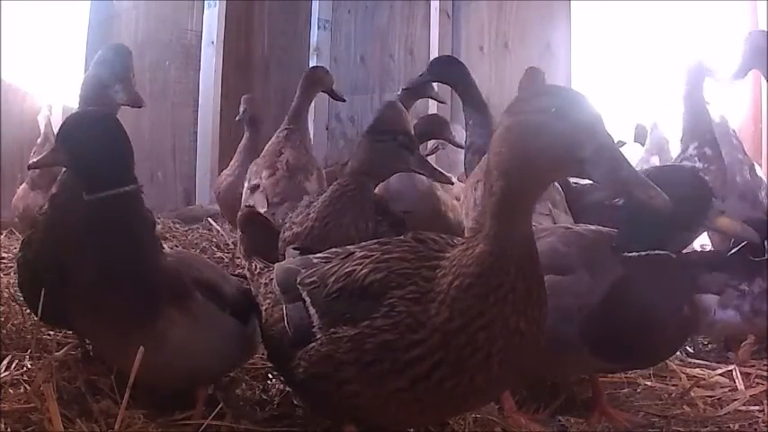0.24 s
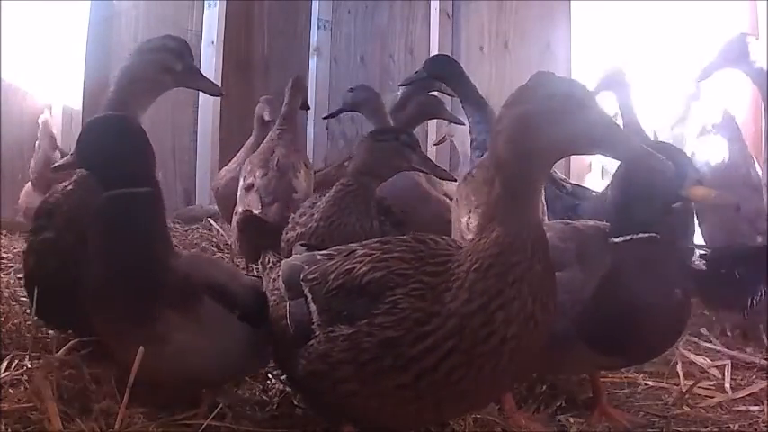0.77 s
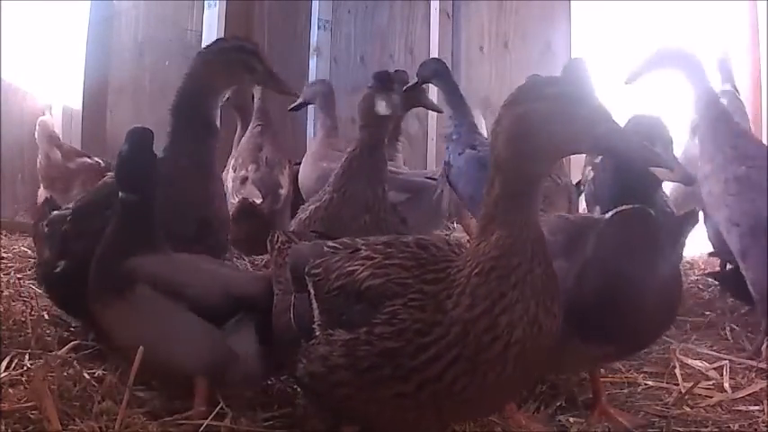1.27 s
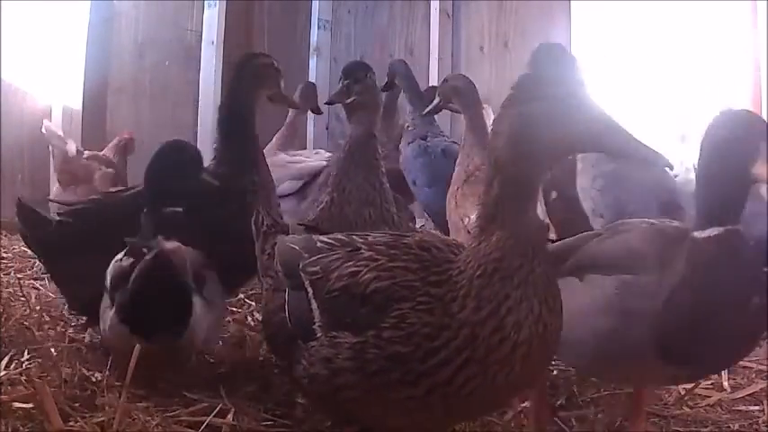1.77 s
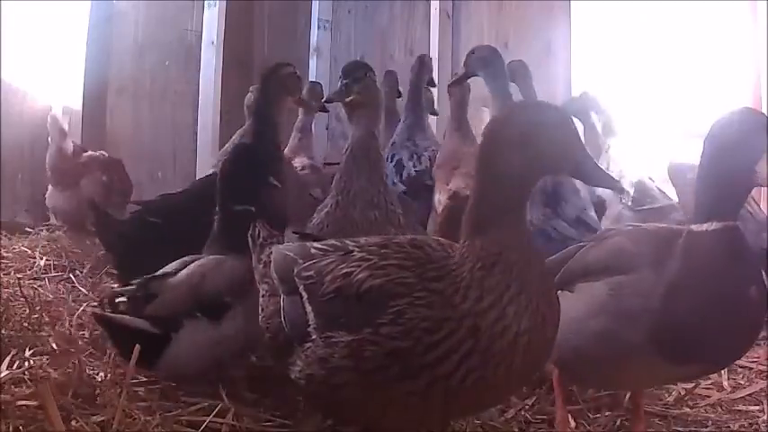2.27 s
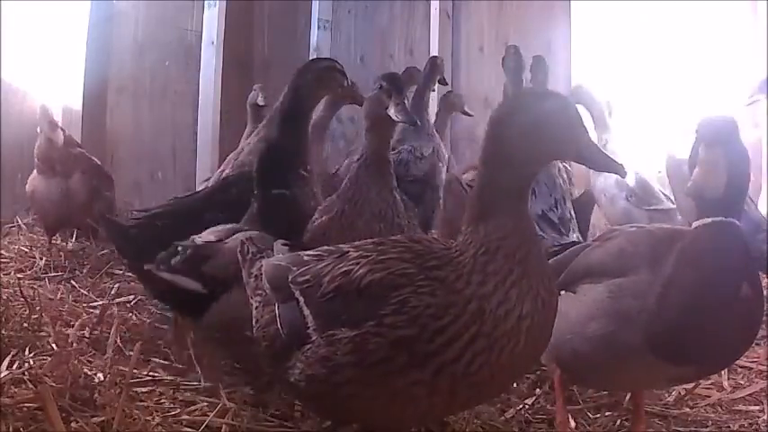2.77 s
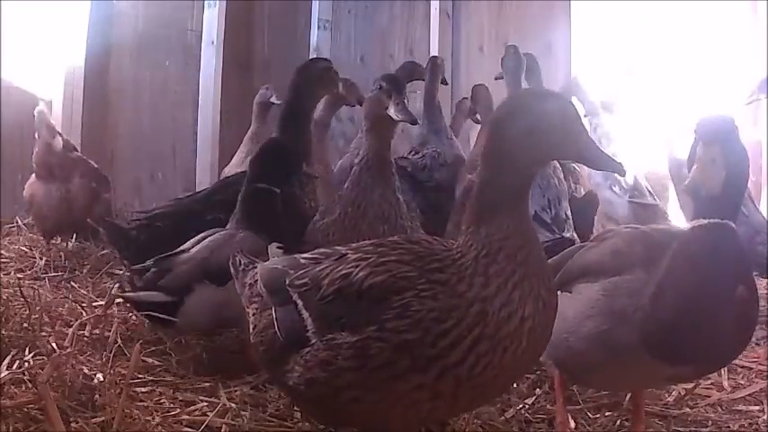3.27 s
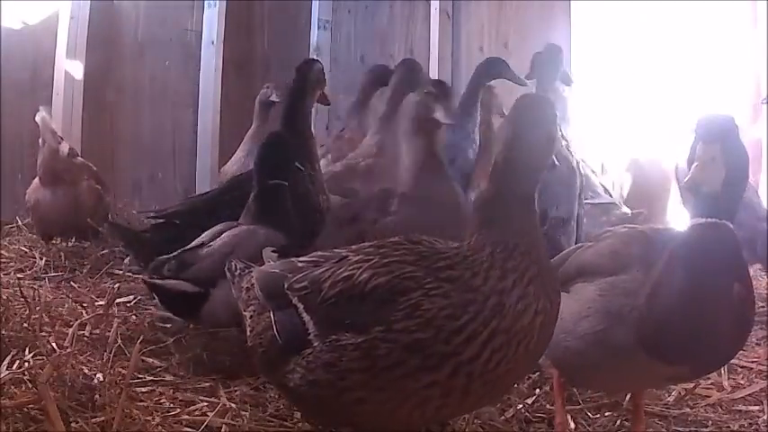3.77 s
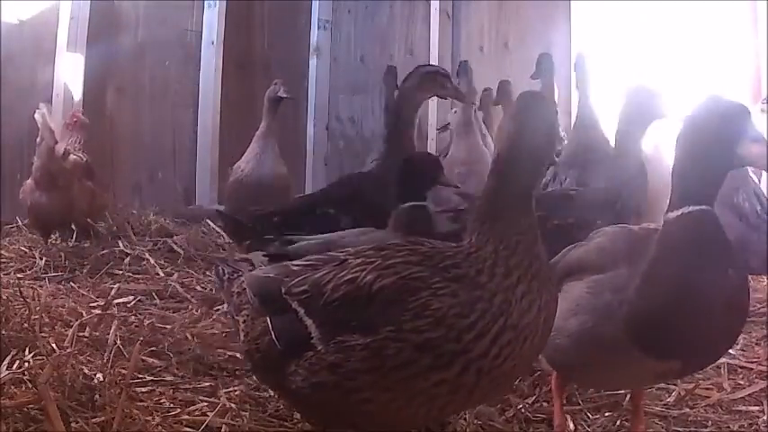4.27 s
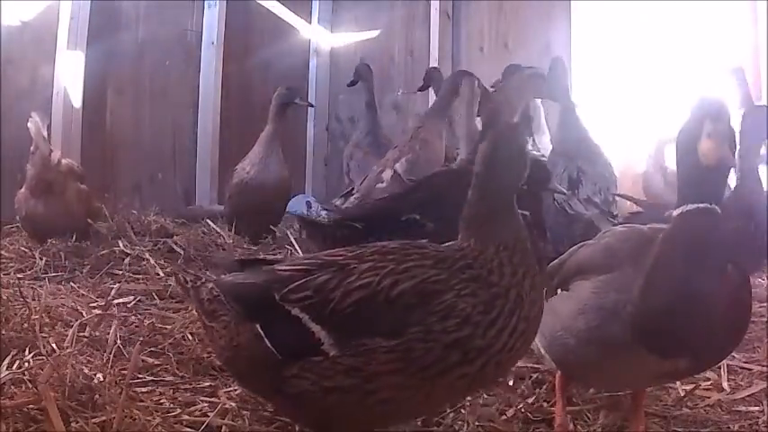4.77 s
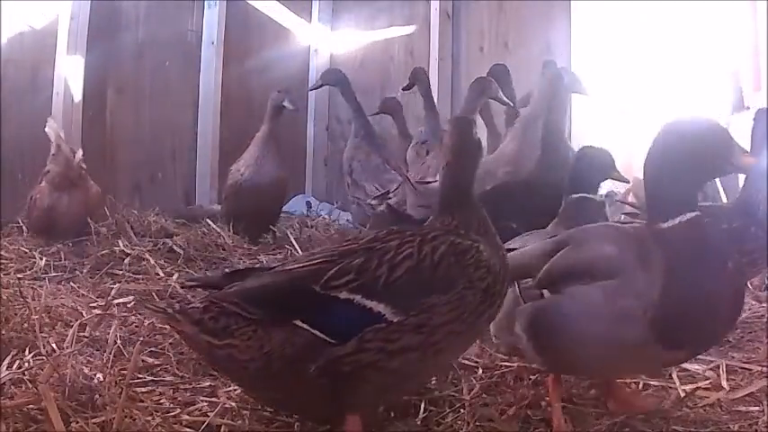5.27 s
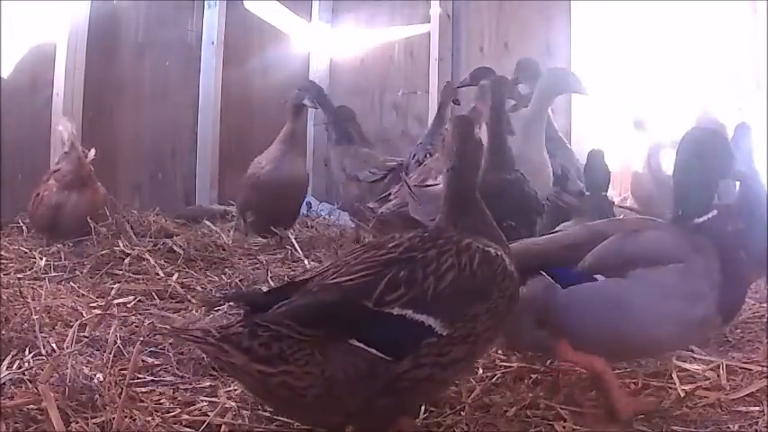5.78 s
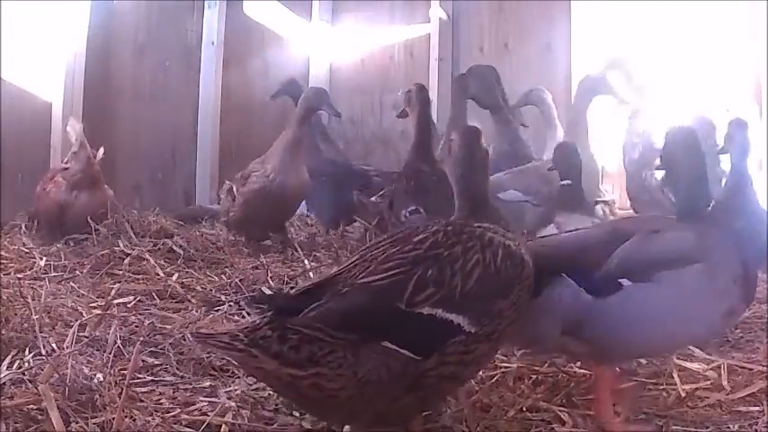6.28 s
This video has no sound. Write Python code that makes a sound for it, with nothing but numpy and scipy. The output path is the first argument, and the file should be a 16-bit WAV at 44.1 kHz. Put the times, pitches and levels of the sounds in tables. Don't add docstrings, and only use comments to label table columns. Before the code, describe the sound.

A flock of ducks close to a cheap small microphone indoors. It begins sparsely with faint raspy calls, a few hesitant quacks and a throaty grumble; after about a second and a half many ducks quack quickly over one another, rough and nasal, some lower and some shriller, some swelling. Short wooden-room echoes fill the gaps above soft air murmur and slight straw rustling. Loud quacks clip, and the chorus is cut off while still going.

```python
import sys
import numpy as np
from scipy import signal
from scipy.fft import rfft, irfft, next_fast_len
from scipy.io import wavfile
from scipy.ndimage import uniform_filter1d

SR = 44100
rng = np.random.default_rng(int(sys.argv[2]) if len(sys.argv) > 2 else 0)


def wrap_up_sound(samples):
    columns = np.atleast_2d(samples).T
    tamed = np.clip(columns, -1, 1)
    steps = np.round(tamed * 32767).astype(np.int16)
    wavfile.write(sys.argv[1], SR, steps)


def makeup_ratio(level_db):
    decades = np.asarray(level_db, float) / 20
    return 10 ** decades


N = 288414

# start_s, length_s, effort_db, pitch_hz,
# opening_0_1
FIRST_QUACKS = [
    (.752, 0.049, -33, 283.3, 1),
    (.822, 0.055, -37, 266.6, .05),
    (1.005, 0.089, -28, 247, 0),
    (1.114, 0.11, -21.5, 256, 0.02),
    (1.22, 0.1, -29.5, 245, 0.4),
    (1.335, 0.053, -21.5, 273, 0.98),
]
# start_s, length_s, effort_db, pitch_hz, opening_0_1
NARROW_BILL_QUACKS = [
    (1.502, .11, -16.5, 244.9, 0.21),
    (1.613, .12, -21.5, 253.3, 0.42),
    (2.224, 0.1, -16, 276.2, 0.17),
    (2.397, 0.047, -19, 247.5, 0.04),
    (2.969, .07, -16, 243.4, 0.33),
    (3.245, .08, -16.5, 248.1, 0.38),
    (5.032, .1, -24.5, 213.5, 0.2),
    (5.505, .09, -17.5, 221.3, 0.13),
    (5.771, 0.067, -13, 249, 0.16),
    (6.263, 0.036, -24, 233.9, 0.07),
]
# start_s, length_s, effort_db, pitch_hz, opening_0_1
MIDDLE_QUACKS = [(1.832, 0.065, -18.5, 248, 0.17), (1.981, 0.044, -17, 246.3, .45),
                 (2.614, .08, -14.5, 241.1, 0.5), (2.669, 0.076, -16.5, 250.8, .4),
                 (3.481, 0.098, -22.5, 238.7, 0.57), (4.343, 0.11, -22.5, 237, 0.2),
                 (4.554, .105, -11, 245.6, 0.5), (4.668, 0.041, -27, 244.2, 0.3),
                 (5.134, 0.075, -15, 248.8, 0.5), (5.831, 0.046, -14.5, 237.1, 0.64),
                 (5.866, 0.049, -17, 225.8, 0.12), (5.964, 0.065, -37.5, 234, 0.2)]
# start_s, length_s, effort_db, pitch_hz, opening_0_1
SHRILL_QUACKS = [
    (1.735, 0.07, -41.5, 267, 0.9),
    (2.774, .07, -20, 264, 0.88),
    (3.056, .1, -19, 245.7, 0.81),
    (3.631, 0.039, -27.5, 247.5, 0.88),
    (3.736, .07, -17, 256.7, 0.41),
    (4.43, 0.099, -18, 245.2, .6),
    (6.083, .08, -19.5, 239.6, 0.65),
]
# start_s, length_s, starting_effort_db, pitch_hz, opening_0_1
SWELLING_QUACKS = [(1.865, .1, -19.5, 255.4, .2), (2.067, 0.093, -24.5, 254.9, 0.46),
                   (2.344, .055, -16, 261.1, 0.4), (2.492, 0.12, -29, 239.9, 0.68),
                   (2.867, 0.091, -23.5, 234.7, 0.6), (3.532, 0.079, -25, 247.2, 0.7),
                   (3.867, .105, -22.5, 249.3, 0.47), (3.979, .07, -17.5, 248.5, .4),
                   (4.094, 0.082, -21.5, 256, 0.7), (4.203, 0.12, -17.5, 243.9, .45),
                   (4.733, .12, -27, 217.1, 0.4), (4.847, .13, -18, 236.6, 0.5),
                   (5.4, .095, -21.5, 249.4, 0.5), (5.578, 0.1, -21, 230.1, 0.22),
                   (6.022, 0.071, -31.5, 238, 1), (6.162, 0.097, -21, 243.5, 0.4),
                   (6.482, 0.074, -21, 231, 0.2)]
# second_hz, second_db, third_db, body_db, bright_db
WINDPIPES = [
    (2260, -12.5, 13, 2.5, -0.5),
    (2268, -5, 3, 3, 4),
    (2150, 2, 3.5, 1, 4.5),
    (2150, 1, 10.5, 2.5, 4.5),
    (2150, 3, 10, 2, 6),
]
# attack_s, attack_depth_db, sag_db_per_s, release_db_per_s
BREATHS = [
    (0.041, 21, 33.5, 398),
    (0.034, 25, 30.5, 449.5),
    (0.034, 25, 34, 452.5),
    (0.032, 23, 29, 448.5),
    (0.039, 22.5, -39.5, 348),
]
# mode_hz, width_hz, level_db
UPPER_MODES = [(3650, 240, -0.5), (3930, 1300, 5), (4950, 160, -10), (5290, 260, 2)]
# freq_hz, level_db
THROAT_SPECTRUM = [(150, -51), (300, -38), (620, -27.5), (780, -21), (900, -12), (1070, -14), (1180, -2.5),
                   (1420, 0), (1800, -8), (2230, -12.5), (2480, -18.5), (2850, -23.5), (3200, -33),
                   (5500, -58)]
# start_s, length_s, effort_db, bill_hz
FAR_CALLS = [
    (0.049, 0.062, -34.5, 2200),
    (0.251, 0.08, -33.5, 2400),
    (0.448, .05, -33, 2060),
    (0.701, 0.046, -47, 2150),
]
# attack_s, attack_depth_db, sag_db_per_s, release_db_per_s
FAR_BREATH = (.035, 22, 100, 700)
# freq_hz, level_db
FAR_THROAT_SPECTRUM = [(530, -95.5), (900, -53), (1200, -26), (1420, -7), (1690, -11), (1770, -18.5),
                       (1990, -5), (2270, -6.5), (3000, -11.5), (3140, -22), (3650, -20.5), (4550, -34.5),
                       (5500, -45), (7150, -75), (12100, -120)]
# time_s, level_db, throat_hz
GRUMBLE = [
    (.72, -63, 356),
    (.78, -54, 740),
    (.88, -51.5, 800),
    (.96, -84, 697),
    (1.02, -43.5, 873),
    (1.16, -42.5, 1005),
    (1.3, -48.5, 920),
    (1.38, -60, 600),
    (1.5, -85, 500),
]
# freq_hz, t60_s
BARN_DECAY = [(250, 0.57), (1200, 0.36), (2400, 0.34), (5000, 0.28)]
# freq_hz, level_db
YARD_SPECTRUM = [(24, -41), (40, -8.5), (84, -6.5), (129, -16), (547, -17), (1080, -11.5), (1380, 2),
                 (1630, -4), (2050, -0.5), (2840, -6), (4120, -18.5), (5060, -31), (5500, -35),
                 (7150, -62.5), (12100, -120)]
# time_s, level_db
HISS_LEVEL = [
    (0.0, -89),
    (1.0, -85),
    (1.5, -83),
    (1.8, -78),
    (1.95, -81),
    (3.1, -85),
    (4.202, -86),
    (5.402, -83.5),
    (6.54, -85.5),
]
# freq_hz, level_db
HISS_SPECTRUM = [(5000, -38.5), (6000, -9.5), (6900, 2.5), (8000, -14.5), (9000, -1.5), (11000, 4.5),
                 (15500, -3.5), (16000, -28)]
# freq_hz, gain_db
CRACKLE_SPECTRUM = [(20, 3), (600, 0), (4500, -1), (6000, -20), (6900, -15), (8000, -27), (10500, -10),
                    (15500, -13), (16000, -40)]


def quack(start_s, length_s, effort_db, pitch_hz, opening, windpipe, breath):
    along, push_db = breath_push(length_s, *breath)
    effort_db = effort_db + push_db
    hz = pitch_hz * (1 + .05 * (.5 - along))
    bill_shut_hz, bill_wide_hz, bill_fall = 1167, 1830, 0.062
    bill_hz = (bill_shut_hz + (bill_wide_hz - bill_shut_hz) * opening) * (1 + bill_fall * (.5 - along))
    second_hz, second_db, third_db, body_db, bright_db = windpipe
    second_db = second_db + 3.5 * (opening - .5)
    bright_db = bright_db + 2.5 * (opening - .5)
    bright_db = bright_db - 0.37 * (effort_db.max() + 18)
    bright_db = bright_db + 0.25 * np.maximum(push_db, -30)

    lead = syrinx(hz, jitter=.018, uneven_db=3.5, rough=.25)
    voice = lead + 1.45 * resonate(lead, bill_hz, 250)
    for pitch_ratio, bill_ratio in [(.86, 0.978), (1.19, 1.213)]:
        duck = syrinx(hz * pitch_ratio, jitter=.03, uneven_db=3.5, rough=.35)
        duck = duck + 2.5 * resonate(duck, bill_hz * bill_ratio, 200)
        voice = voice + makeup_ratio(-2.0 + 3.03 * drift(len(hz), 0.031)) * duck

    modes = makeup_ratio(-2.0 + second_db) * resonate(voice, second_hz + 0 * hz, 540)
    modes = modes + makeup_ratio(-5.0 + third_db) * resonate(voice, 2780 + 0 * hz, 170)
    for mode_hz, width_hz, level_db in UPPER_MODES:
        mode = resonate(voice, mode_hz + 0 * hz, width_hz)
        modes = modes + makeup_ratio(level_db + 5 * drift(len(hz), .06)) * mode
    voice = colour(voice + modes, THROAT_SPECTRUM)

    treble = signal.sosfilt(signal.butter(2, 3300, "high", fs=SR, output="sos"), voice)
    body = signal.sosfilt(signal.butter(4, 1000, "low", fs=SR, output="sos"), voice)
    voice = voice + (makeup_ratio(bright_db) - 1) * treble + (makeup_ratio(body_db) - 1) * body
    voice = voice / np.sqrt(uniform_filter1d(voice ** 2, 1200) + 1e-12)

    chest_db = -39 + 4 * np.clip(drift(len(hz), .02), -3, 1)
    chest_hz = hz * (1 + 0.032 * drift(len(hz), 0.012))
    chest = makeup_ratio(chest_db) * np.sin(2 * np.pi * np.cumsum(chest_hz) / SR)
    fade = signal.windows.tukey(len(voice), 300 / len(voice))
    return start_s, makeup_ratio(effort_db) * (voice + chest) * fade


def syrinx(hz, jitter, uneven_db, rough):
    turns = np.cumsum(hz * (1 + jitter * drift(len(hz), .004))) / SR
    strengths = makeup_ratio(uneven_db * np.clip(rng.standard_normal(2000), -2, 1.3))
    strength = strengths[turns.astype(int) % 2000]
    pulses = np.diff(np.floor(turns), prepend=0) * strength
    puffs = (.25 + np.exp(-(turns % 1) / .45)) * strength * rng.standard_normal(len(hz))
    return (1 - rough) * evened(pulses) + rough * evened(puffs)


def breath_push(length_s, attack_s, attack_db, sag_db_per_s, release_db_per_s):
    t = np.arange(0, .26, 1 / SR)
    along = np.minimum(t / (length_s + .05), 1)
    rise_db = attack_db * np.maximum(1 - t / attack_s, 0) ** 2
    sag_db = sag_db_per_s * np.minimum(t, length_s)
    release_db = release_db_per_s * np.maximum(t - length_s, 0)
    return along, -rise_db - sag_db - release_db


def jostle(x):
    hz, _, z = signal.stft(x, SR, nperseg=512, noverlap=384)
    patches = rng.standard_normal(z.shape[::-1]).T
    for span, axis in [(4, 0), (18, 1), (8, 1)]:
        patches = uniform_filter1d(patches, span, axis)
    depth_db = read([(700, 2), (1500, 1.5), (2500, 2.5), (4500, 3.5)], hz)[:, None]
    return signal.istft(z * makeup_ratio(depth_db * evened(patches)), SR, nperseg=512, noverlap=384)[1][:N]


def far_call(start_s, length_s, effort_db, bill_hz):
    along, push_db = breath_push(length_s, *FAR_BREATH)
    bill_hz = bill_hz * (1 - .04 * along)
    drive = syrinx(160 + 0 * bill_hz, jitter=.12, uneven_db=3, rough=.6)
    voice = colour(drive + resonate(drive, bill_hz, 300), FAR_THROAT_SPECTRUM)
    chest_hz = 320 + 0 * bill_hz
    chest = makeup_ratio(-35) * evened(resonate(resonate(drive, chest_hz, 70), chest_hz, 70))
    fade = signal.windows.tukey(len(voice), .02)
    return start_s, makeup_ratio(effort_db + push_db) * (evened(voice) + chest) * fade


def grumble():
    time_s, level_db, throat_hz = np.transpose(GRUMBLE)
    t = time_s[0] + np.arange(0, .8, 1 / SR)
    level_db = np.interp(t, time_s, level_db)
    throat_hz = np.interp(t, time_s, throat_hz)
    drive = syrinx(120 + 0 * t, jitter=.08, uneven_db=3, rough=.6)
    voice = resonate(resonate(drive, throat_hz, 160), throat_hz, 160)
    chest_hz = 330 + 0 * t
    chest = resonate(resonate(drive, chest_hz, 140), chest_hz, 140)
    fade = signal.windows.tukey(len(voice), .05)
    return time_s[0], makeup_ratio(level_db - 6.0) * (evened(voice) + makeup_ratio(-11.5) * evened(chest)) * fade


def barn(x):
    out = np.zeros(N)
    at = np.arange(160, SR // 2 - 20, 20)
    for spot in range(3):
        taps = np.zeros(SR // 2)
        taps[at + rng.integers(0, 20, len(at))] = rng.choice([-1., 1.], len(at))
        hz, t, z = signal.stft(taps, SR, nperseg=256)
        decay = makeup_ratio(-60 * t / read(BARN_DECAY, hz)[:, None])
        tail = signal.istft(z * decay, SR, nperseg=256)[1]
        share = np.sqrt(2 / 3) * np.cos(np.pi * (1.7 * np.arange(N) / SR + spot / 3))
        out += signal.fftconvolve(share * x, tail / np.linalg.norm(tail))[:N]
    return out


def yard():
    return makeup_ratio(-58.5) * noise(YARD_SPECTRUM, patchy_db=2.0)


def high_hiss(far, near):
    time_s, level_db = np.transpose(HISS_LEVEL)
    hiss = makeup_ratio(np.interp(np.arange(N) / SR, time_s, level_db) - 0.5 + 2 * drift(N, .03))
    power = (makeup_ratio(-65) * far) ** 2 + (makeup_ratio(-73.0) * near) ** 2
    breath = np.sqrt(abs(uniform_filter1d(power, 600)))
    return (hiss + breath) * noise(HISS_SPECTRUM, patchy_db=.8)


def noise(points, patchy_db):
    frames, hz = N // 256 + 5, np.fft.rfftfreq(1024, 1 / SR)
    a, b, patches = rng.standard_normal((frames, 513, 3)).T
    patches = evened(uniform_filter1d(uniform_filter1d(patches, 10, 0), 10, 1))
    z = (a + 1j * b) * makeup_ratio(read(points, hz)[:, None] + patchy_db * patches)
    return evened(signal.istft(z, nperseg=1024, noverlap=768)[1][:N])


def resonate(x, hz, width_hz):
    turn = np.exp(2j * np.pi * np.cumsum(hz) / SR)
    r = np.exp(-np.pi * width_hz / SR)
    return 2 * (turn * signal.lfilter([1 - r], [1, -r], x / turn + 1e-18)).real


def colour(x, points):
    gain_db = np.maximum(read(points, abs(np.fft.fftfreq(8192, 1 / SR))), -110)
    log_gain = np.log(makeup_ratio(gain_db))
    taps = np.fft.ifft(np.exp(np.conj(signal.hilbert(log_gain)))).real[:4096]
    return signal.oaconvolve(x, taps)[:len(x)]


def drift(size, seconds):
    span = max(round(seconds * SR), 2)
    return evened(uniform_filter1d(uniform_filter1d(rng.standard_normal(size), span), span))


def evened(x):
    return x / np.sqrt(np.mean(x ** 2) + 1e-20)


def read(points, hz):
    f, value = np.transpose(points)
    return np.interp(np.log(hz + 1), np.log(f + 1), value)


def add(mix, start_s, sound):
    part = mix[round(start_s * SR):][:len(sound)]
    part += sound[:len(part)]


def scene():
    far, near = np.zeros(N), np.zeros(N)
    groups = [FIRST_QUACKS, NARROW_BILL_QUACKS, MIDDLE_QUACKS, SHRILL_QUACKS, SWELLING_QUACKS]
    for quacks, windpipe, breath in zip(groups, WINDPIPES, BREATHS):
        for row in quacks:
            add(near, *quack(*row, windpipe, breath))
    for row in FAR_CALLS:
        add(far, *far_call(*row))
    add(near, *grumble())
    near = jostle(near)
    ducks = makeup_ratio(-0.5) * (far + near) + barn(makeup_ratio(-8.5) * far + makeup_ratio(-4.5) * near)
    edge = signal.cheby2(10, 35, 5900, fs=SR, output="sos")
    return (signal.sosfilt(edge, ducks + yard()) + high_hiss(far, near))[None]


def top_cut(x):
    return signal.sosfilt(signal.butter(12, 15830, fs=SR, output="sos"), x)


def record(dry):
    high = signal.butter(1, 200, "high", fs=SR, output="sos")
    bent = dry[0] + makeup_ratio(-18.5) * signal.sosfilt(high, dry[0] ** 2)
    bent = bent * np.minimum(np.arange(N, 0, -1) / 12, 1) ** .5
    size = next_fast_len(N)
    swing = uniform_filter1d(abs(signal.hilbert(bent, size)[:N]), 25)
    limited = bent / (1 + (swing / .5) ** 8) ** (1 / 8)
    cut = limited - np.clip(limited, -.475, .475)
    gain = makeup_ratio(read(CRACKLE_SPECTRUM, np.fft.rfftfreq(size, 1 / SR)))
    crackle = irfft(rfft(cut, size) * gain, size)[:N]
    return top_cut((limited - crackle)[None])


dry = scene()
out = record(dry)
wrap_up_sound(out)
```